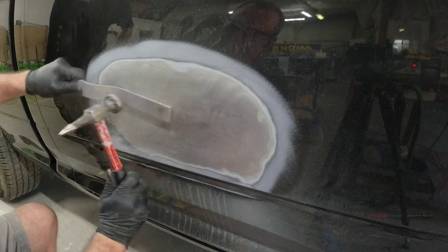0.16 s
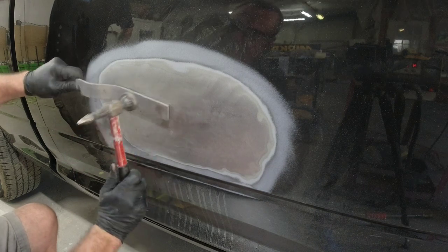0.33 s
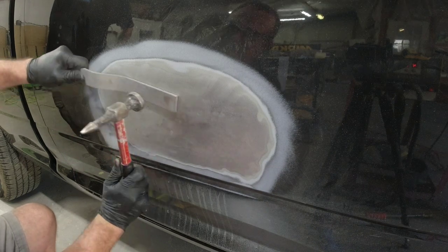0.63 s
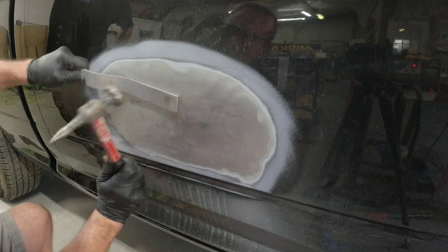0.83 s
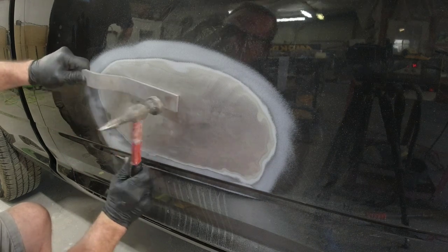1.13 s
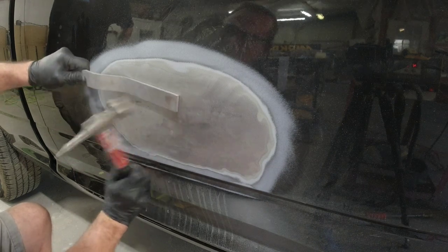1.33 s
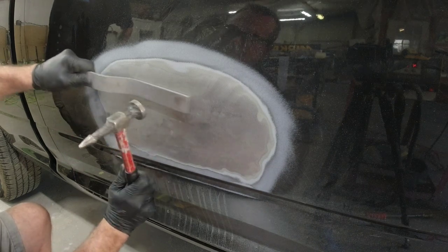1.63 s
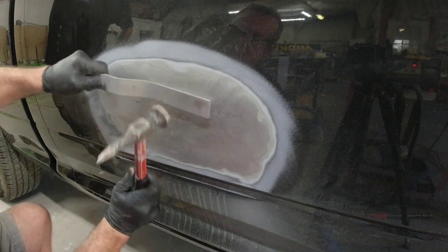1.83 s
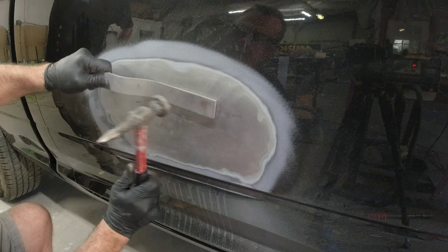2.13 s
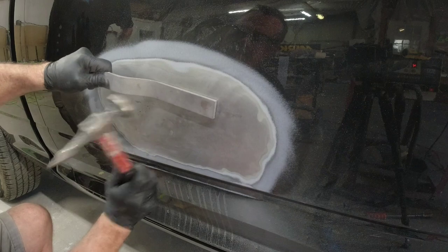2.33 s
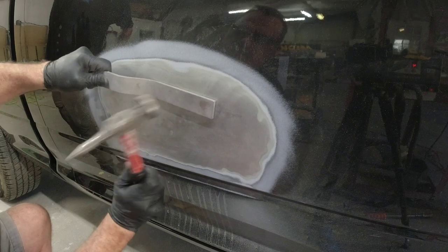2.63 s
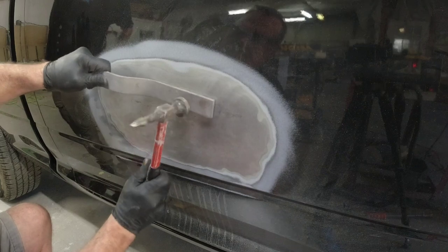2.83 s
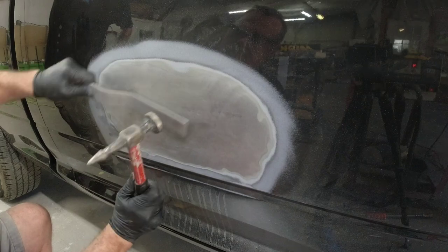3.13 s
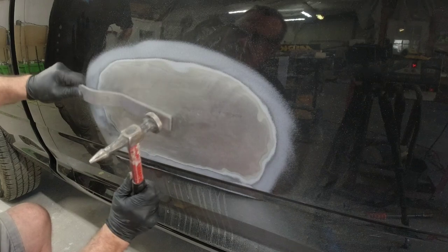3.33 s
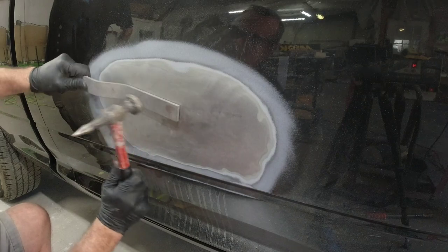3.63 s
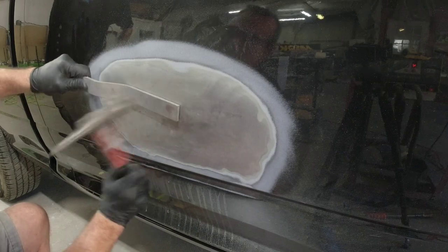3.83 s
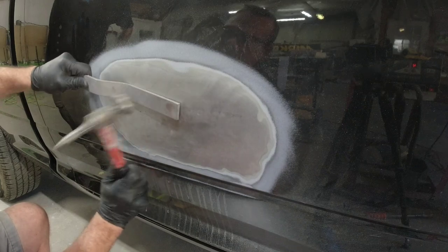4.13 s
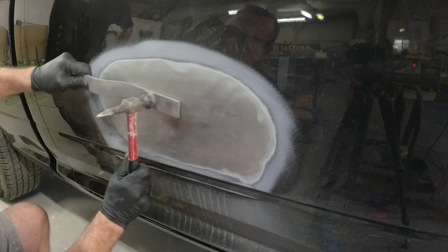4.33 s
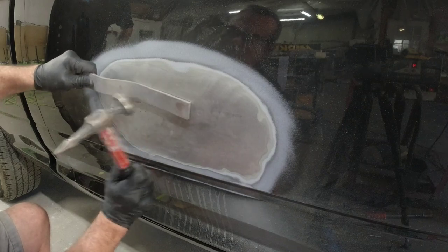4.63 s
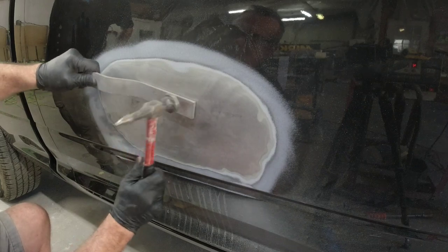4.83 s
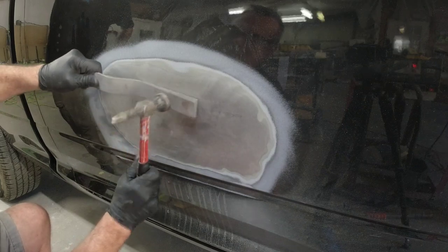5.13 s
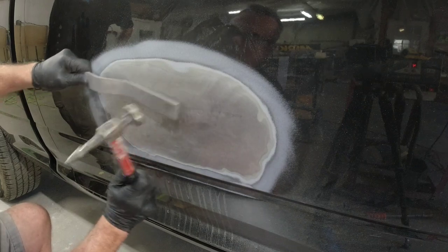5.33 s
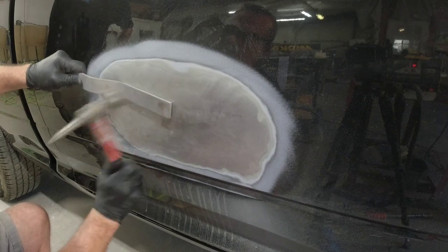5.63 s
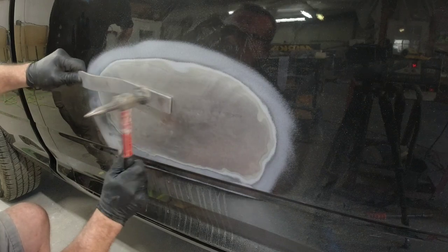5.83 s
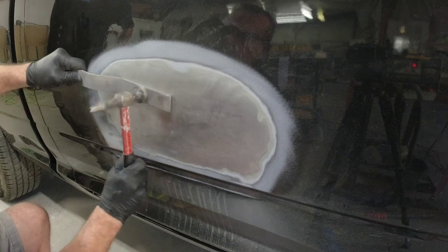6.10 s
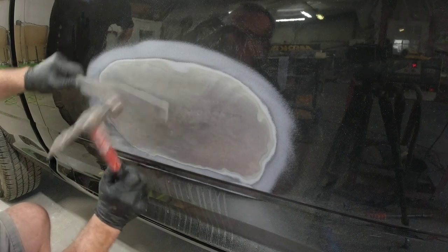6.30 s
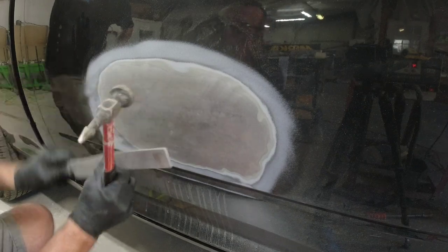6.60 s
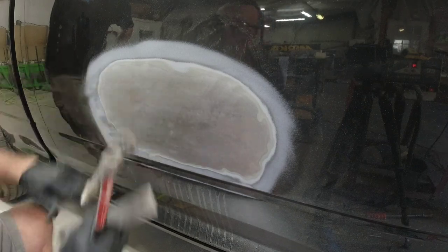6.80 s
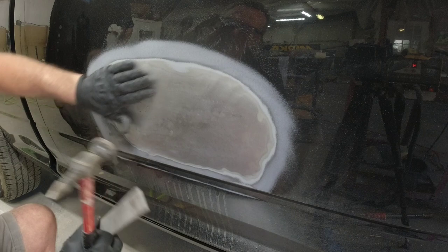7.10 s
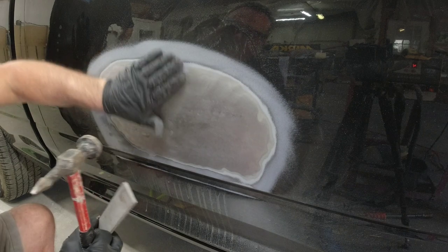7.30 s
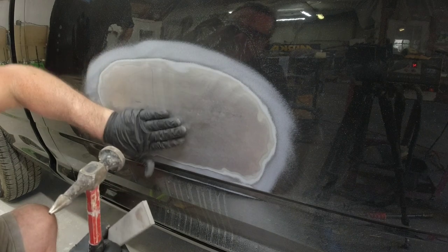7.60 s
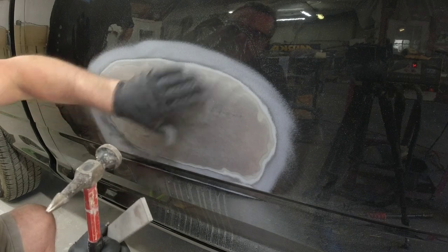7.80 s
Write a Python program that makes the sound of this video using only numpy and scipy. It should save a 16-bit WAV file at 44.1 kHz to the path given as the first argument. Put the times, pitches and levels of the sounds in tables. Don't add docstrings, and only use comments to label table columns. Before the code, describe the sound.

Loud steel-on-steel whacks, peaks flattened by microphone overload, set a hollow door panel booming. The damped spoon rings only briefly, bounces into rapid second clacks, and drags with dry gritty scrapes in the pauses. Blows crowd closer later on, then stop; the door's low hum dies into quiet garage reverberation, and rubber-gloved strokes whisper across the sanded surface with one tiny squeak.

```python
import sys
import numpy as np
from scipy import signal
from scipy.fft import rfft, irfft, next_fast_len
from scipy.io import wavfile
from scipy.ndimage import uniform_filter1d

SR = 44100
rng = np.random.default_rng(int(sys.argv[2]) if len(sys.argv) > 2 else 0)


def transcribe(u):
    v = np.clip(np.atleast_2d(u).T, -1, 1)
    q = np.round(v * 32767).astype(np.int16)
    wavfile.write(sys.argv[1], SR, q)


def invert_db(x):
    u = np.asarray(x, float) / 20
    return 10 ** u


N = 350746
LEAD_S = 0.2
LEAD = int(LEAD_S * SR)
TOTAL = N + LEAD
SIZE = next_fast_len(TOTAL + SR // 4)
FREQS = np.arange(SIZE // 2 + 1) * SR / SIZE + 1e-3
RING_S = 0.125
SPOTS = 3

# (time [s], spoon level [dB], loudest spoon ring [Hz], door boom [dB], hammer head ring [dB])
BLOWS = [(-0.03, -7, 4530, 7.5, -3), (1.187, -3.5, 4767, 8.5, -4.7), (1.5517, -4, 4100, -5, 4),
         (2.5783, -2.5, 3770, -1, -0.5), (2.97, -2.5, 4474, -4, 3), (4.0662, -2.5, 3994, 6, 0.9),
         (4.4398, -1.5, 3742, -1, -4), (4.8963, -4.5, 4340, 3, 0.5), (5.2735, -2, 3793, -1, -6),
         (5.874, -5, 4030, 1.8, -8), (6.2425, -2.5, 3694, 5, -13)]
# (time [s], spoon level [dB], loudest spoon ring [Hz], hammer head ring [dB])
REBOUNDS = [
    (1.222, 0, 4080, -16),
    (1.5807, 2.5, 4594, -12.5),
    (1.6107, -3.5, 3604, -16.5),
    (2.606, 3, 3630, -16.5),
    (4.0988, 6, 3844, -3.5),
    (4.5156, 6.5, 4303, -3),
    (4.9252, -2.5, 3550, -14.5),
    (5.9463, 5.5, 3690, -7),
]
# (time [s], spoon level [dB], loudest spoon ring [Hz], door relative to spoon [dB])
TICKS = [(0.1761, -16, 4450, -2.5), (0.2276, -20, 4740, -16), (0.418, -34.5, 4100, -24),
         (0.4335, -34, 4150, -24), (0.4928, -49.5, 4225, -12.5), (0.5171, -35.5, 4266, -12.5),
         (0.561, -28, 4085, -7), (2.032, -45.5, 7800, -5.5), (2.051, -40.5, 4220, -15),
         (3.185, -26.5, 4350, -6), (3.2022, -26.5, 4200, -12.5), (3.2324, -29.5, 3600, -14),
         (3.4608, -40.5, 4000, -9), (5.423, -28.5, 4300, -14), (5.514, -22, 4700, -3.5),
         (5.909, -7, 4200, -24), (6.002, -23, 4000, -13.5), (6.054, -16.5, 4430, -9),
         (6.066, -27, 4160, -12), (6.8223, -32.5, 3240, -10)]
# (frequency [Hz], level [dB], t60 [s])
SPOON = [(3120, -10, .015), (3304, -10, 0.028), (3655, -6.5, 0.04), (4030, -7, 0.031), (4350, -4.5, 0.027),
         (4640, -4.5, 0.028), (4970, -0.5, 0.0089), (5550, -10, 0.022), (6200, -14.5, 0.039),
         (6650, -12.5, 0.042), (7600, -19, 0.013), (8210, -12, 0.031), (9300, -15, 0.042),
         (10800, -18, 0.1), (12000, -23.5, 0.0082), (12900, -19, 0.0077), (13400, -26, .01)]
# (frequency [Hz], level [dB], t60 [s])
HEAD = [(3700, -8, .03), (4800, -4, .022), (6640, -3, .016), (6780, 1.5, .02), (6920, -4, .016),
        (8370, -5, .016), (9640, -13, .022), (10590, -14, .02), (11330, -17, .016)]
# (frequency [Hz], level [dB], t60 [s])
DOOR = [(49.4, -12, 2.2), (56.9, -12, 1.9), (92.7, -10, 0.66), (101.04, 4, 0.67), (129.5, -1, 0.15),
        (147.3, -4, 0.93), (153.3, -2.5, 0.83), (165.6, -4.5, 0.71), (195.2, -5, 0.32), (204.5, -11.5, 1),
        (227.7, -5, 0.46), (246.8, -4.5, 0.93), (252, -4.5, 0.79), (275.8, -3, 0.74), (340, -14, 0.063),
        (406, -13.5, 0.43), (395, -16.5, 0.98), (474, -8.5, 0.36), (526, -6, 0.93), (556, -5, 0.48),
        (557, 3, 0.2), (583.6, 2, 0.47), (678, -7.5, 0.54), (853, -14.5, 0.39), (945, -9.5, 0.77)]
# (frequency [Hz], level [dB])
CLANG = [(30, -49), (60, -13), (150, 2), (400, 1), (800, -3), (1200, -10.5), (2000, -13.5), (3000, -23),
         (4500, -18.5), (7000, -24), (10000, -26), (15000, -35.5)]
# (frequency [Hz], t60 [s])
CLANG_T60 = [(60, 1), (500, 0.35), (2000, 0.22), (6000, 0.4), (15000, 0.039)]
# (start [s], hardest press [s], lift-off [s], pressure [dB], share heard through the door [dB])
DRAGS = [
    (0.174, .31, 0.34, -31, -7.5),
    (0.382, .43, 0.51, -60.5, 8.5),
    (.555, 0.562, .64, -42.5, -6.5),
    (0.645, 0.68, 0.73, -54, 3.5),
    (1.732, 1.879, 2.06, -36, -8),
    (2.049, 2.07, 2.08, -48.5, -3.5),
    (3.177, 3.286, 3.45, -32.5, -4),
    (3.488, 3.556, 3.686, -40.5, -0.7),
    (5.332, 5.413, 5.3, -35, -10.5),
    (5.503, 5.512, 4.8, -34.5, -13),
]
# (frequency [Hz], level [dB])
RASP = [(880, -31), (1500, -8.5), (2160, -14), (2450, -17), (2650, -8), (3180, -9), (3860, -4),
        (4410, -4.5), (5610, -18), (6740, -19), (7420, -24), (10100, -25), (15000, -46)]
# (frequency [Hz], level [dB])
SKIN_RUMBLE = [(150, -27), (400, -2.5), (600, 3.0), (750, 0.5), (1000, -3.0), (1300, -5.0),
               (1600, -16.5), (2500, -34.5), (6000, -59.0)]
# (start [s], length [s], hiss level [dB])
WIPE = [
    (7.157, 0.32, -55),
    (7.421, 0.39, -58),
    (7.796, 0.59, -50.5),
]
# (frequency [Hz], level [dB])
GLOVE = [(1060, -16), (1800, -11), (2070, -24), (2520, -10.5), (3560, -5.5), (5360, -6.5), (10200, -12),
         (15000, -23)]
# (frequency [Hz], level [dB])
MURMUR = [(47, -37), (80, -3.5), (151, -2), (179, -12.5), (246, -3), (305, -16), (401, -5.5), (694, -12.5),
          (995, -13), (2500, -36.5), (3250, -60.5), (5500, -120)]
# (time [s], spread [s], level [dB], lower tone [Hz], upper tone [Hz])
SQUEAK = (7.35, .02, -47, 910, 1060)
# (time [s], level [dB], frequency [Hz], t60 [s])
KNOCK = (2.326, -45, 950, .012)
# (frequency [Hz], t60 [s])
GARAGE_T60 = [(60, 0.49), (300, 0.57), (1000, 0.75), (3000, 0.64), (7000, 0.57), (10000, 0.51),
              (15000, 0.12)]
# (frequency [Hz], level [dB])
WALLS = [(25, -19.5), (45, -4), (300, -4), (2000, 1.5), (6000, -3), (16000, -5.0)]
# (frequency [Hz], level [dB])
HUSH = [(18, -28), (30, -36.5), (48, -12), (64, -4.5), (76, -10.5), (107, 1), (136, -19), (228, -3),
        (328, -23), (460, -16.5), (2430, -36.5), (3680, -37), (15000, -59.5)]
# (frequency [Hz], level [dB])
TOP_CUT = [(8000, 0), (15200, -4), (15600, -16), (16600, -26), (16900, -70)]


def contacts():
    heavy, light = [], []
    for s, db, hz, boom_db, _ in BLOWS:
        clang_db = 0.82 if s > 0 else -5
        heavy.append((s, db, hz, 0.044, boom_db - db, clang_db - db))
    for s, db, hz, _ in REBOUNDS:
        light.append((s, db, hz, 0.041, -15, -19))
    for s, db, hz, door_db in TICKS:
        light.append((s, db, hz, 0.019, door_db - 3, door_db))
    return heavy, sorted(light)


def spoon_note(hz, t60, soft, t):
    chance = rng.standard_normal((len(SPOON), 2))
    modes = [(hz, 1.5, 0.016), *SPOON]
    note = 0
    for (f, mode_db, mode_t60), (strength, detune) in zip(modes, [(0, 0), *chance]):
        decay = fade(min(mode_t60 * t60 / 0.054, 0.045), RING_S)
        gain = invert_db(mode_db + 0.83 * strength + soft * abs(f - hz) / 2000)
        note = note + gain * np.sin(2 * np.pi * f * (1 + 0.01 * detune) * t) * decay
    return note * (1 - np.exp(-t / (0.00002 - 0.00012 * soft)))


def strikes(events, over_db, shove_s):
    out = np.zeros((3 + SPOTS, TOTAL + SR))
    t = np.arange(int(RING_S * SR)) / SR
    for k, (s, db, hz, t60, boom_db, clang_db) in enumerate(events):
        i = LEAD + int(s * SR)
        rough = rng.standard_normal((3, len(t)))
        soft = 0.16 * min(db, 0)
        note = spoon_note(hz, t60, soft, t)
        crack = invert_db(-6.5 + 3 * soft) * np.diff(rough[0], prepend=0) * fade(0.014, RING_S)
        push = scatter(rough[1] * (t / shove_s) * np.exp(-t / shove_s))
        slap = scatter(rough[2] * np.exp(-t / (0.21 * shove_s)))
        out[0, i:i + len(t)] += invert_db(db + over_db) * (note + crack)
        out[1, i:i + len(t)] += invert_db(db + boom_db) * push
        out[2, i:i + len(t)] += invert_db(db + clang_db) * push
        out[3 + k % SPOTS, i:i + len(t)] += invert_db(db + clang_db) * slap
    return out[:, :TOTAL]


def head():
    jolt = np.zeros(TOTAL + SR)
    for s, *_, db in [*BLOWS, *REBOUNDS]:
        burst = scatter(rng.standard_normal(int(RING_S * SR)) * fade(7 * 0.0019, RING_S))
        i = LEAD + int(s * SR)
        jolt[i:i + len(burst)] += invert_db(db - 9.5) * burst / np.sqrt(np.sum(burst ** 2))
    rings = sum(invert_db(db) * ring(jolt, hz, t60) for hz, db, t60 in HEAD)
    linger, sizzle = afterglow()
    return rings[:TOTAL] + linger + sizzle


def afterglow():
    linger, shaking = np.zeros((2, TOTAL + SR))
    linger_t60, sizzle_t60 = 0.05, 0.25
    t = np.arange(int(3 * RING_S * SR)) / SR
    for s, db, hz, *_ in BLOWS:
        i = LEAD + int(s * SR)
        linger[i:i + len(t)] += invert_db(db - 26.5 - 60 * t / linger_t60) * np.sin(2 * np.pi * hz * t)
        shaking[i:i + len(t)] += invert_db(-25 - 60 * t / sizzle_t60)
    highpass = signal.butter(2, 11000, "high", fs=SR, output="sos")
    chatter = signal.sosfilt(highpass, rng.standard_normal(TOTAL))
    return linger[:TOTAL], shaking[:TOTAL] * chatter * flutter(depth_db=2.5)


def door(boom, thud, *clang):
    deep_hz = 70
    deep = sum(invert_db(db) * ring(boom, hz, t60) for hz, db, t60 in DOOR if hz < deep_hz)
    skin = sum(invert_db(db) * ring(thud, hz, t60) for hz, db, t60 in DOOR if hz >= deep_hz)
    dense = 0
    for spot in clang:
        dense = dense + signal.fftconvolve(spot, diffuse(CLANG_T60, CLANG, 0.8))[:len(spot)]
    return invert_db(-38.5) * deep + invert_db(-34.5) * skin + invert_db(11) * dense


def drag():
    size = (2, TOTAL)
    grit = (rng.random(size) < 0.3) * rng.standard_normal(size)
    rasp = unit(colour(grit[0], RASP) * flutter(depth_db=2.36))
    rumble = unit(colour(grit[1], SKIN_RUMBLE) * flutter(depth_db=1.5))
    on_edge, sharp, on_skin = pressure()
    edge = 0
    for hz, band in patches(rasp, depth_db=3.5, swells_per_s=42.0):
        edge = edge + (on_edge if hz < 4900 else sharp) * band
    return edge + invert_db(4.5) * on_skin * rumble


def pressure():
    press_db, sag_db_per_s, lift_db_per_s = 7, 75, 420
    t = time_axis()
    edge, sharp, skin = 0, 0, 0
    for start, hardest, lift, db, door_db in DRAGS:
        rise = press_db * (hardest - t) / max(hardest - start, 0.003)
        under = np.where(t < hardest, rise, sag_db_per_s * (t - hardest))
        under = under + lift_db_per_s * np.maximum(t - lift, 0)
        touch = np.clip((t - start) / 0.02 + 1, 0, 1)
        edge = edge + touch * invert_db(db - under)
        skin = skin + touch * invert_db(db + door_db - 0.54 * under)
        sharp = sharp + touch * invert_db(db - under - 0.75 * (door_db + 6))
    return edge, sharp, skin


def glove():
    rub = rng.standard_normal((2, TOTAL))
    hiss, murmur = palm()
    rubber = unit(colour(rub[0], GLOVE))
    skin = unit(colour(rub[1], MURMUR))
    return hiss * rubber + murmur * skin + squeak() + dull_hiss(rubber)


def palm():
    t = time_axis()
    down = np.clip((t - 6.82) / 0.5, 0, 1)
    hiss, speeds = 0, 0
    for s, length, db in WIPE:
        speed = np.sin(np.pi * np.clip((t - s) / length, 0, 1))
        hiss = hiss + invert_db(db) * speed ** 0.82
        speeds = speeds + speed
    return hiss, down * invert_db(-48.5 + 2.5 * speeds)


def squeak():
    t = time_axis()
    s, spread, db, *tones = SQUEAK
    tone = unit(sum(np.sin(2 * np.pi * hz * t) for hz in tones) * flutter(depth_db=3))
    return invert_db(db) * tone * np.exp(-0.5 * ((t - s) / spread) ** 2)


def dull_hiss(rubber):
    t = time_axis()
    lowpass = signal.butter(4, 5600, fs=SR, output="sos")
    dulled = signal.sosfilt(lowpass, rubber[::-1]) * flutter(depth_db=1.5)
    fade_in = np.clip((t - 6.6) * 10, 0, 1)
    fade_out = np.clip((WIPE[0][0] - t) * 10 + 1, 0, 1)
    return invert_db(-69) * fade_in * fade_out * dulled


def knock():
    s, db, hz, t60 = KNOCK
    tap = np.zeros(TOTAL)
    tap[LEAD + int(s * SR)] = 1
    return invert_db(db) * ring(tap, hz, t60)


def garage(panel, spoon, rubbing, steel):
    walls = diffuse(GARAGE_T60, WALLS, 1.2)
    walls = np.concatenate([np.zeros(int(0.006 * SR)), walls])
    sent = invert_db(-14.5) * panel + invert_db(-24.0) * spoon + invert_db(-23.0) * rubbing + invert_db(-9.5) * steel
    return signal.fftconvolve(sent, walls)[:TOTAL]


def hush():
    return invert_db(-59.5) * unit(colour(rng.standard_normal(TOTAL), HUSH))


def time_axis():
    return np.arange(TOTAL) / SR - LEAD_S


def unit(x):
    return x / np.sqrt(np.mean(x ** 2))


def along(table, hz):
    table_hz, values = np.array(table).T
    return np.interp(np.log(hz), np.log(table_hz), values)


def colour(x, table):
    return irfft(rfft(x, SIZE) * invert_db(along(table, FREQS)), SIZE)[:len(x)]


def fade(t60, seconds):
    return np.exp(-np.log(1000) * np.arange(int(seconds * SR)) / SR / max(t60, 0.002))


def ring(x, hz, t60):
    pole = np.exp(2j * np.pi * hz / SR - np.log(1000) / (max(t60, 0.003) * SR))
    return signal.lfilter([pole.imag], [1, -2 * pole.real, abs(pole) ** 2], x)


def diffuse(t60_table, colour_table, seconds):
    size = int(seconds * SR)
    hz = np.arange(size // 2 + 1) / seconds + 1e-3
    noise = rfft(rng.standard_normal(size)) * invert_db(along(colour_table, hz))
    out = 0
    for centre in 30 * 2 ** np.arange(0, 10, 0.5):
        share = np.clip(1 - 2 * abs(np.log2(hz / centre)), 0, 1)
        out = out + irfft(noise * share, size) * fade(along(t60_table, centre), seconds)
    return out / np.sqrt(np.sum(out ** 2))


def scatter(burst):
    lines = rfft(burst)
    size = abs(lines)
    return irfft(lines * (np.mean(size) / size) ** 0.8, len(burst)) * fade(0.25, RING_S)


def wander(size, hold):
    steps = np.repeat(rng.standard_normal(size // hold + 1), hold)[:size]
    return uniform_filter1d(steps, size=hold)


def flutter(depth_db):
    return invert_db(depth_db * unit(wander(TOTAL, 250)))


def patches(x, depth_db, swells_per_s):
    lines = rfft(x)
    hz = np.arange(len(x) // 2 + 1) * SR / len(x) + 1e-3
    for centre in 800 * 2 ** np.arange(0, 4.4, 1 / 3):
        swell = wander(len(x), int(SR / swells_per_s))
        share = np.clip(1 - 3 * abs(np.log2(hz / centre)), 0, 1)
        yield centre, irfft(lines * share, len(x)) * invert_db(depth_db * swell)


def scene():
    heavy, light = contacts()
    hits = strikes(heavy, over_db=13.0, shove_s=0.018)
    taps = strikes(light, over_db=-4.5, shove_s=0.0064)
    spoon, *pushes = hits + taps
    steel = head()
    panel = door(*pushes)
    rubbing = drag() + glove() + knock()
    direct = spoon + steel + panel + rubbing
    mix = direct + garage(panel, spoon, rubbing, steel) + hush()
    return mix[None, LEAD:]


def roll_off(x):
    return signal.sosfilt(signal.butter(12, 16830, fs=SR, output="sos"), x)


def record(dry):
    clip_at, knee = 0.7, 30.0
    heard = signal.sosfilt(signal.butter(2, 36, "high", fs=SR, output="sos"), dry)
    flat = heard / (1 + abs(heard / clip_at) ** knee) ** (1 / knee)
    tilted = signal.sosfilt(signal.butter(1, 14, "high", fs=SR, output="sos"), flat)
    mix = colour(tilted[0], TOP_CUT)[None]
    return roll_off(mix)


dry = scene()
out = record(dry)
transcribe(out)
```